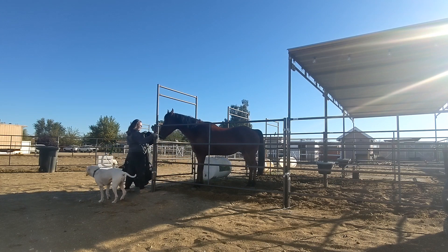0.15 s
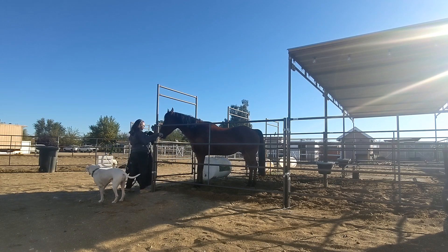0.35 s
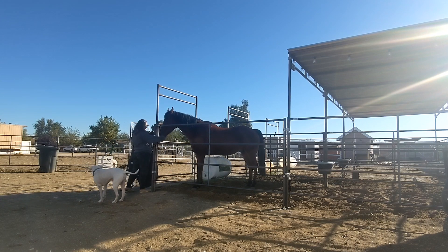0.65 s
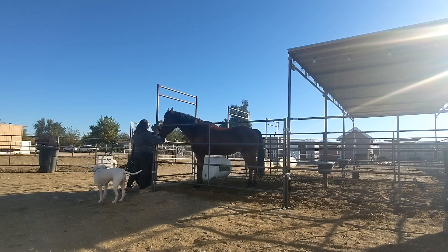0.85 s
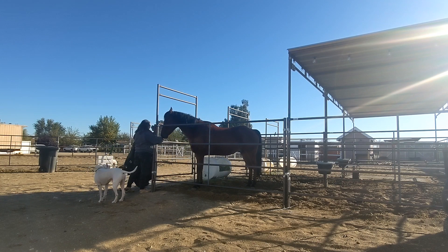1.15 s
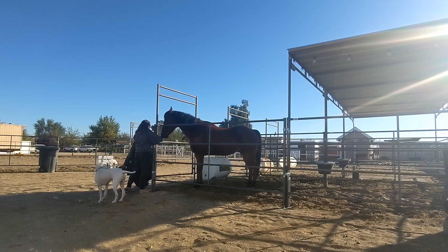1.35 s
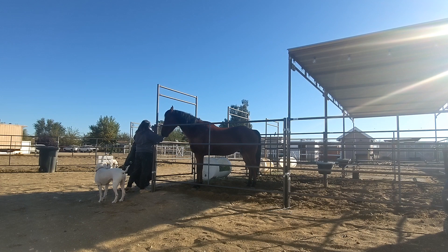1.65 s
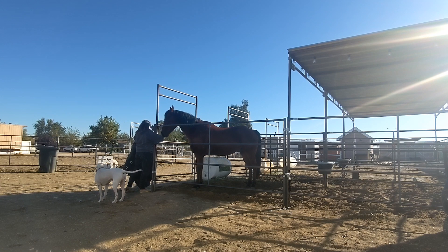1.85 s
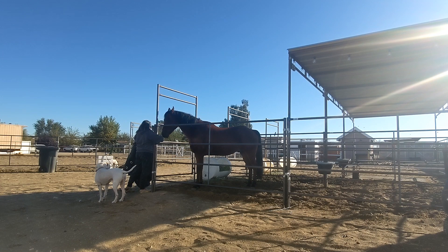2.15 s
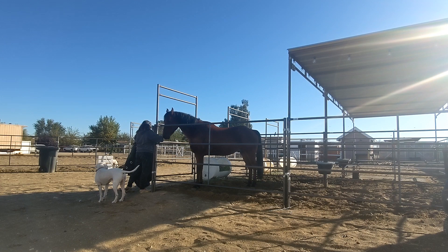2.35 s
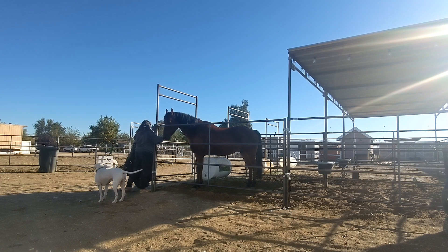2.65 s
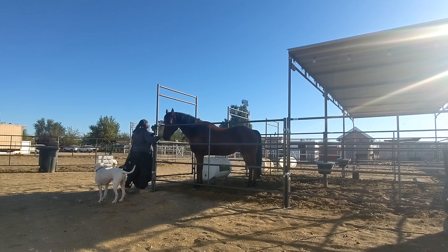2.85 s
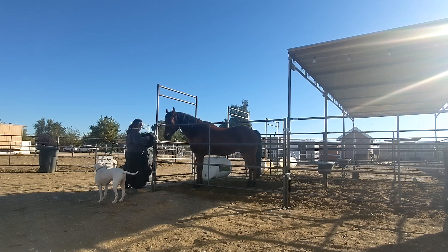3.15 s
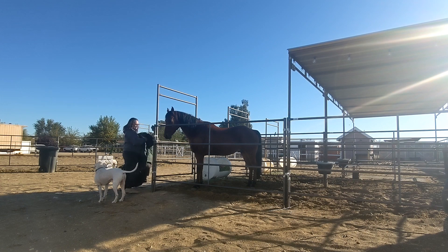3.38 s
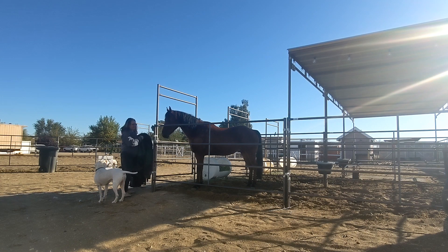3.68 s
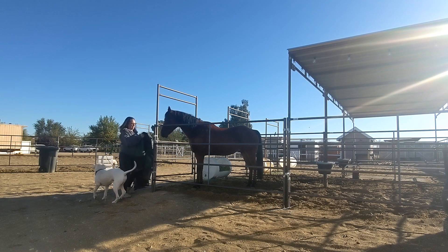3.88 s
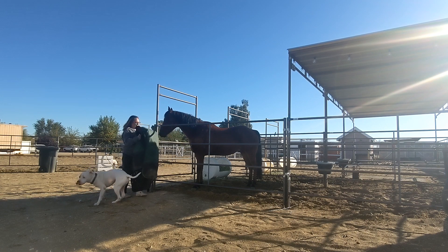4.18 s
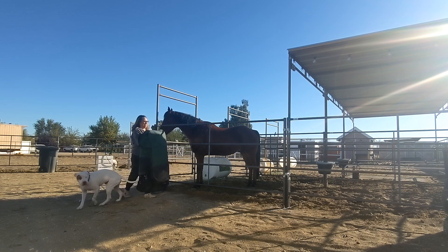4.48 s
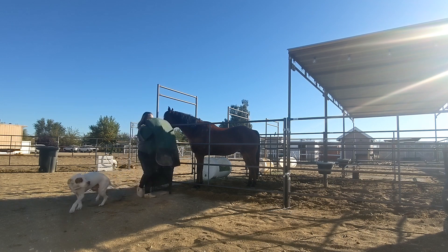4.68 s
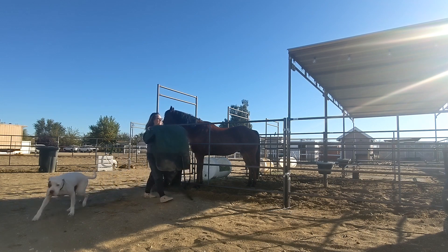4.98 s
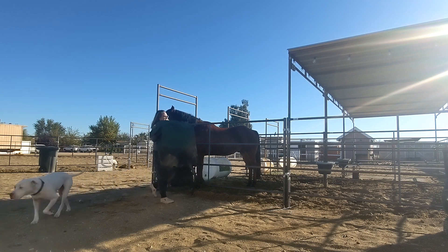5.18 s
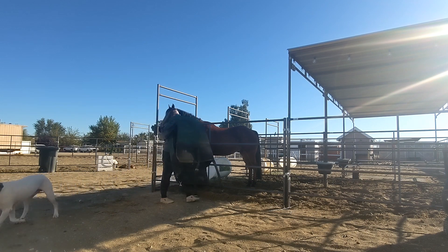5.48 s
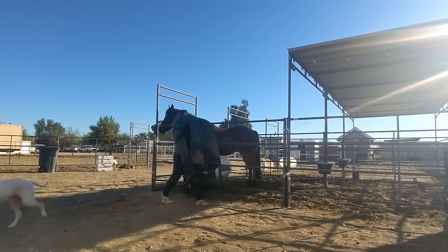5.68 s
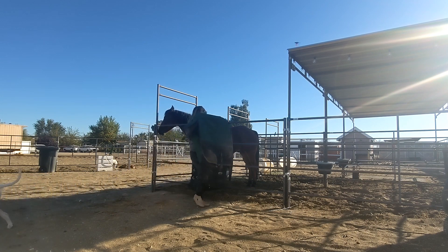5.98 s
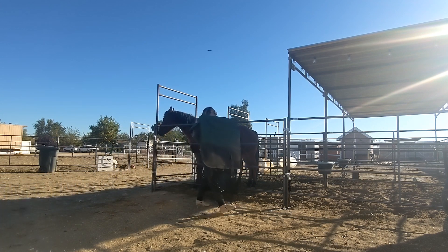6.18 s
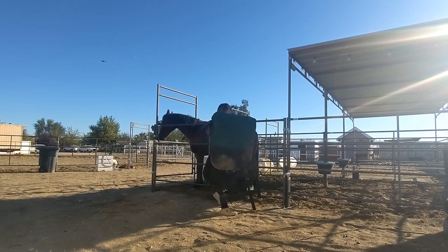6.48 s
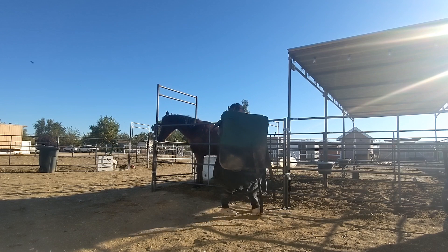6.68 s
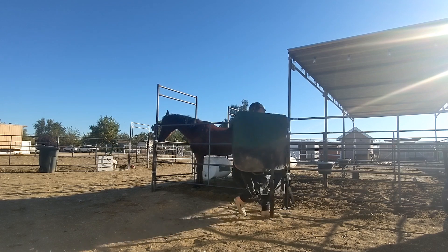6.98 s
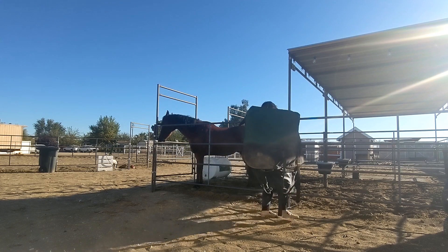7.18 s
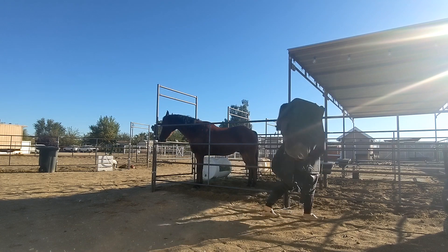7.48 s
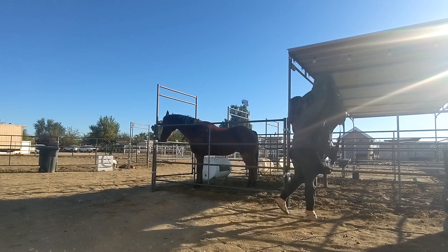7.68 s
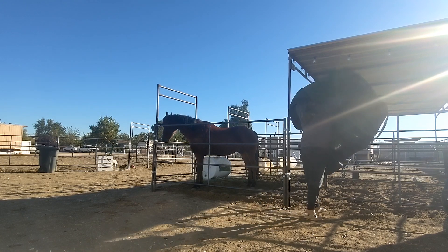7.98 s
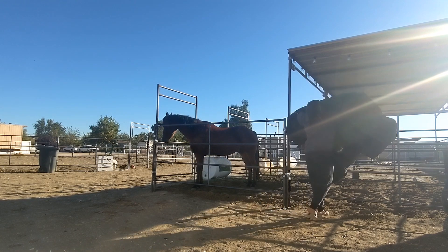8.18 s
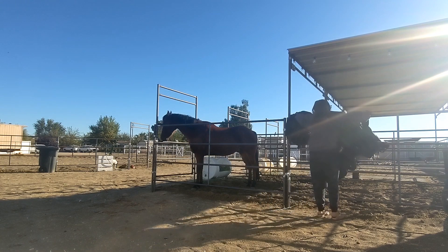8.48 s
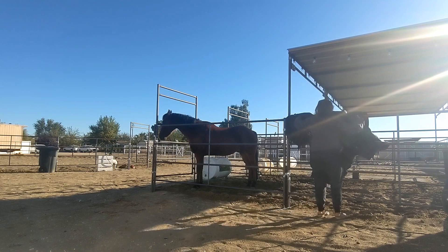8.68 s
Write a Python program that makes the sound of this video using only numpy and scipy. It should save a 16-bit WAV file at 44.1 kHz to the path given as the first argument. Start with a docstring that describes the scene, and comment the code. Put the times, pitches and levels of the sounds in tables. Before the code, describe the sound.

At an outdoor horse pen, a metal snap and chain clank hard on hollow steel pipes in the first second, then clink faintly as the snap is worked and pings free. A stiff blanket rustles with scuffs and soft footfalls, a buckle knocks once, a small bird chirps twice, and finally buckles strike the rail amid big cloth flaps. Stereo microphones in open air, with faint hiss and distant low rumble.

```python
"""A chain and snap clank on the steel pipes of an outdoor horse pen: noise through crowded resonances,
plus ringing modes. A stiff blanket rustles as it is carried (swelling noise bands), then its buckles
strike the top rail. Straps and grit tick, cloth and boots scuff, feet thud: short noise bursts.
A small bird chirps twice (gliding sines) over a low, distant rumble and a faint hiss (shaped noise)."""
import sys
import numpy as np
from scipy import signal
from scipy.fft import rfft, irfft, next_fast_len
from scipy.io import wavfile

SR = 44100
rng = np.random.default_rng(int(sys.argv[2]) if len(sys.argv) > 2 else 0)


def int16_out(signal):
    """Quantize to a 16-bit WAV file."""
    q = np.round(np.clip(np.atleast_2d(signal).T, -1, 1) * 32767)
    wavfile.write(sys.argv[1], SR, q.astype(np.int16))


N = 389844
TIME_S = np.arange(N) / SR
AGE_S = np.arange(SR) / SR  # one second from the start of a sound

# Event levels are relative: each source adds its own trim.
# blows on the steel pipes (two on the gate, then one buckle knock at 4.3 s), the snap knocking as it
# is worked, buckles hitting the rail:
# (time [s], level [dB], treble [dB re level], ring [dB], rattle length [s])
PIPE_BLOWS = [(0.585, -7, -9, -2, 0.0092), (0.99, -13, -11, -1, 0.018), (4.302, -14.5, -9, -15, 0.0059)]
SNAP_BLOWS = [(0.004, -28.5, -38, 0, 0.029), (0.128, -22, -18, -3.5, .014), (1.08, -9.5, -19, -5.5, 0.009),
              (1.335, -42.5, -40, 0, 0.042), (1.851, -24.5, -22, -1, 0.036),
              (1.997, -24, -19.5, -5.5, 0.017), (2.118, -40.5, -37, -3.5, 0.012),
              (2.27, -41.5, -27, -2.5, .03), (2.3, -35.5, -16, -8, 0.031), (2.361, -30, -10, -6.5, 0.0048),
              (2.509, -34.5, -14, -11, 0.022), (2.541, -33.5, -20, -4, 0.027),
              (2.606, -28, -11.5, -8, 0.013), (2.879, -25, -19, -7.5, 0.026)]
BUCKLE_BLOWS = [(7.779, -12.5, -6, 1, 0.02), (8.075, -11.5, -4, -3, 0.017), (8.206, -9.5, -13, -9.5, 0.013),
                (8.34, -26.5, -9, -10.5, 0.012), (8.72, -38.5, -14, -15, 0.044),
                (8.807, -14.5, 0, -1.5, 0.003)]
# clearest touches of chain links: (time [s], level [dB])
LINK_TOUCHES = [(0.0574, -42), (0.2802, -34), (0.319, -35), (0.374, -26.5), (0.3948, -28), (0.882, -35.5),
                (1.586, -41.5), (1.914, -42)]
# dry ticks of straps and grit: (time [s], level [dB])
TICKS = [(0.3704, -32.5), (0.9049, -30.5), (3.9374, -33), (4.6457, -32.5), (5.418, -43.5), (5.909, -46.5),
         (6.7763, -41.5)]
# scuffs of heavy cloth and boots: (time [s], level [dB])
SCUFFS = [(3.573, -38.5), (4.46, -35.5), (4.651, -38.5), (4.849, -39), (5.063, -29.5), (5.692, -53.5),
          (8.422, -37.5)]
# dull footfalls and bumps: (time [s], level [dB])
THUDS = [(0.68, -35.5), (2.651, -41.5), (2.911, -38.5), (4.47, -37.5), (4.635, -33.5), (5.077, -60),
         (6.26, -41), (8.238, -34)]
# blows that set off the gate's clear note: (time [s], level [dB])
SINGING = [(0.0, -49), (1.08, -58), (2.926, -38.5)]
# pulls and swings of the blanket: (time of height [s], length [s], flap [dB], rub [dB], swish [dB])
SWINGS = [(3.59, 0.13, -65, -63, -60.5), (3.787, 0.23, -60.5, -53.5, -51), (3.911, 0.059, -65, -57, -47.5),
          (4.347, 0.42, -55, -53, -54.5), (4.665, 0.097, -56.5, -51.5, -53),
          (4.89, 0.26, -60.5, -46, -50.5), (5.173, 0.31, -60, -52.5, -58), (6.804, 0.13, -65, -56.5, -59.5),
          (7.533, 0.35, -52.5, -51.5, -51), (7.855, 0.3, -46, -46.5, -46), (8.305, 0.56, -48.5, -55.5, -52),
          (8.826, 0.16, -55, -48, -64)]
# bird notes: (time of middle [s], length [s], pitch [Hz], glide [octaves], level [dB])
CHIRPS = [(5.48, .1, 4760, -.6, -58), (6.188, 0.049, 2570, 0, -55.5), (6.19, .04, 4020, -0.088, -57),
          (6.276, 0.069, 4760, 0.15, -47), (6.28, 0.056, 2660, 0.39, -44)]

# ringing modes of pipes, snap, rail and links, and the snap's ping as it comes free:
# (frequency [Hz], level [dB], t60 [s])
PIPE_MODES = [(950, -11, .6), (1005, -7.5, .73), (1416, -1, .7), (1440, -7.5, .57), (1884, -10, .6),
              (2110, -5, .33), (2320, -12, .5), (2670, -16, .6), (2790, -4.5, .37), (3220, -10, .62),
              (3790, -8, .25), (5450, -5.5, .35), (5660, -2, .5), (5540, -4, .6), (5740, -5, .6),
              (5840, -3.5, .46), (6126, -13, .45), (6890, -12, .29), (6690, -12, .4), (7600, -2, .44),
              (8500, -6, .35), (10150, -5, .35), (13800, -7, .35), (15280, -2.5, .22), (15685, 6, .22)]
SNAP_MODES = [(988, -7.5, 1.0), (1503, -2, 0.38), (1547, -3, 0.34), (2053, -4.5, 0.27), (2470, -3.5, .8),
              (2596, -2.5, .55), (2724, -1.5, .35), (2920, -8.5, 0.47), (3030, -7.5, 1), (3290, -4, .25),
              (3590, -9.5, 0.72), (4326, 2.5, 0.15), (5740, -8.5, .26), (6632, -7, .25), (7240, 0, 0.22),
              (8370, 5.5, .26), (8600, 4, 0.29)]
RAIL_MODES = [(671.6, -4, 0.85), (758, -7, 0.97), (1034, -5.5, 1), (1371, 1, 0.61), (1865, -4, 0.66),
              (2000, -11, 0.5), (2640, -3.5, 0.35), (3370, -11.5, 0.58), (5490, 2, 0.51), (5420, 5.5, 0.33),
              (5680, -2.5, 0.37), (6240, -11, 0.27), (6700, 7.5, 0.099), (8560, 3.5, 0.14),
              (8630, -9, 0.15), (15300, 5, 0.15), (15400, -8, .35)]
LINK_MODES = [(10110, -2, .17), (10310, -0.5, .35), (10300, -4.5, 0.13), (11230, -2, .16),
              (11170, -1, 0.16), (12020, -0.5, .16), (12100, -8, 0.13)]
RELEASE_MODES = [(8385, -34, 0.5), (8410, -28, 0.23)]
# resonances of the rubbing folds: (frequency [Hz], width [Hz], level [dB])
FOLDS = [(1567, 400, -3.5), (2350, 840, -2), (3390, 1300, -10.5)]

# colour of the dense clatter; a pipe's wall modes crowd above 5.4 and 15.2 kHz:
# (frequency [Hz], level [dB])
PIPE_CLATTER = [(300, -28), (700, -5.5), (980, 3), (1200, -3.5), (1900, 6), (2300, -1), (3000, -4.5),
                (4400, -5.5), (5150, -12), (5600, 2), (8500, -3.5), (11500, -12), (14300, -8.5),
                (15500, -0.5)]
SNAP_CLATTER = [(300, -36.5), (600, -11), (1000, -6.5), (1250, -8), (1520, 2), (1800, -10), (2500, -1),
                (3400, 7.5), (5000, -1.5), (6200, 5.5), (8600, -2.5), (9600, -2), (12000, -10),
                (15500, -13)]
RAIL_CLATTER = [(250, -33), (480, 1.5), (680, 10), (1150, -1), (1900, 7), (2800, -0.5), (5150, -5.5),
                (5480, 11.5), (7400, -2.5), (8600, -2.5), (10500, -9.5), (12900, -7), (14900, -2),
                (15300, 1.5)]
# colour of the short contacts: (frequency [Hz], level [dB])
TICK_COLOUR = [(400, 2.5), (1200, 0), (3000, 1.5), (7000, -3.5), (16000, -3)]
SCUFF_COLOUR = [(250, 6.5), (600, -7.5), (1200, 3), (2400, -6), (4000, -10.5), (12000, -24)]
THUD_COLOUR = [(40, -23), (85, -2), (140, 3.5), (200, -8), (300, -16), (800, -35), (4000, -65.5)]
# colour of the flapping folds and the swishing shell: (frequency [Hz], level [dB])
FLAP_COLOUR = [(200, -6), (300, -8.5), (520, -2), (850, -0.5), (1150, -2.5), (1700, -22.5)]
SWISH_COLOUR = [(1760, -26.5), (3000, 3.5), (3910, -2.5), (4290, -1.5), (7400, 1.5), (10800, -8),
                (15000, 0), (16000, -11)]
# colour of the surroundings: (frequency [Hz], level [dB])
RUMBLE_COLOUR = [(12, -58), (20, -30.5), (27, -36.5), (30, -65), (40, -12.5), (108, -0.5), (125, -1),
                 (145, -4), (203, -13), (258, -16), (403, -29), (500, -28.5), (650, -64.5), (1100, -120)]
AIR_COLOUR = [(240, -29.5), (400, -5), (814, -1), (1400, -8.5), (1630, -11), (2120, -7.5), (3210, -16.5),
              (6540, -19), (10900, -30), (15000, -22), (16000, -17)]
# likeness of left and right noise: (frequency [Hz], correlation [-1..1])
LIKENESS = [(30, 0.88), (130, 1), (260, 0.71), (600, 0.24), (1500, 0.19), (4000, 0), (16000, 0.13)]
# difference between the two microphones: (frequency [Hz], left minus right [dB])
MIC_BALANCE = [(100, -0.5), (1100, 3), (2800, 0), (5500, -0.5), (8500, 4.5), (11000, -1.5), (14000, 7)]
# centres of the bass, middle and treble zones of the modes: (frequency [Hz])
ZONES_HZ = [1400, 5500, 14500]
# soft rustle while the blanket is carried: (flap [dB], rub [dB], swish [dB])
CARRY_DB = [-66.5, -65.5, -69]

RUMBLE_DB, AIR_DB = -49, -61
CARRY_S, CARRY_FADE_S = 3.34, 0.07
SWELL_SHARE = 0.51  # share of a swing's length spent swelling
ARCH_OCTAVES = 0.17  # sag of a bird note's pitch at both ends
RELEASE_S = 2.88  # the snap comes free
JINGLE_DB, JINGLE_SPREAD_DB = -53.5, 4
SINGING_HZ = 3029
NOTE_ATTACK_S, NOTE_HOLD_S, NOTE_T60_S = 0.027, 0.1, 1.12
BEAT_DEPTH, BEATS_PER_S, FIRST_SWELL_S = 0.44, 6.0, 0.055
# harder blows have thinner bass: dB lost per dB above the reference blow
BASS_LOSS, REFERENCE_BLOW_DB = 0.37, -20.5
CUTOFF_HZ = 15850


def from_db(db):
    """Decibels to gain."""
    return 10 ** (np.asarray(db) / 20)


def rms_one(x):
    """Scale to an rms of 1."""
    return x / np.sqrt(np.mean(x ** 2) + 1e-20)


def at_hz(points, hz):
    """Read a curve on a log-frequency axis."""
    known_hz, values = np.transpose(points)
    return np.interp(np.log(hz + 1), np.log(known_hz), values)


def add(out, time_s, sound):
    """Mix a sound in at a time."""
    start = max(0, round(time_s * SR))
    out[:, start:start + sound.shape[-1]] += sound[..., :N - start]


def panned(left_right_db):
    """Left and right gains for a level difference."""
    return from_db(np.array([[left_right_db], [-left_right_db]]) / 2)


def drift(knots_per_s, size):
    """Straight lines between random knots of spread 1."""
    knots = rng.standard_normal(size // 20 + 2)
    return np.interp(np.arange(size) * knots_per_s / SR, np.arange(len(knots)), knots)


def noise(colour, size, band_hz=(0, SR), comb=1):
    """Stereo noise of a given colour and rms 1, its sides alike mainly in the bass."""
    length = next_fast_len(size, True)
    hz = np.fft.rfftfreq(length, 1 / SR)
    mid, side = rfft(rng.standard_normal((2, length)))
    alike = np.clip(at_hz(LIKENESS, hz), -1, 1)
    pair = np.sqrt(1 + alike) * mid + np.sqrt(1 - alike) * side * [[1], [-1]]
    in_band = (hz >= band_hz[0]) * (hz < band_hz[1])
    spectrum = pair * comb * from_db(at_hz(colour, hz)) * in_band
    return rms_one(irfft(spectrum, length)[:, :size])


def afresh(loop):
    """A loop of noise entered at a random point."""
    return np.roll(loop, rng.integers(SR), axis=-1)


def envelope(attack_s, hold_s, t60_s):
    """Rise, hold and exponential decay."""
    rise = 1 - np.exp(-AGE_S / abs(attack_s))
    return rise * np.exp(-np.log(1000) * np.maximum(AGE_S - hold_s, 0) / abs(t60_s))


def ringing(modes, attack_s, split_hz, twin):
    """Each mode as a decaying complex tone, with a weaker twin that beats against it."""
    tones = []
    for hz, db, t60_s in modes:
        pair_hz = hz + np.array([[0], [split_hz * rng.uniform(0.5, 2.3)]])
        pair = np.array([[1], [twin]]) * np.exp(2j * np.pi * pair_hz * AGE_S)
        tones.append(from_db(db) * pair * envelope(attack_s, 0, t60_s))
    return np.array(tones)


def ring(tones, strength_db=0, scatter_db=1.1):
    """One strike: every mode reaches each side with its own strength and phase."""
    gains = from_db(strength_db + scatter_db * rng.standard_normal((2, len(tones))))
    weights = gains[..., None] * np.exp(2j * np.pi * rng.random((2, len(tones), 2)))
    return np.tensordot(weights, tones, 2).real


def surroundings(throb_db=0.97):
    """Distant, slightly throbbing rumble and a faint even hiss."""
    rumble = from_db(RUMBLE_DB + throb_db * drift(15, size=N)) * noise(RUMBLE_COLOUR, size=N)
    return rumble * panned(1.3) + from_db(AIR_DB) * noise(AIR_COLOUR, size=N)


def bird(level_db=-4.5, waver=0.062, flutter_db=3.3, echo_db=-11):
    """Short gliding whistles, rough from pitch waver, thrown back by the shelter's roof."""
    out = np.zeros((1, N))
    for time_s, length_s, middle_hz, glide, db in CHIRPS:
        along = np.minimum(2 * AGE_S / length_s - 1, 1)  # -1 to 1 across the note
        hz = middle_hz * 2 ** (glide * along / 2 - ARCH_OCTAVES * along ** 2)
        cycles = np.cumsum(hz * (1 + waver * drift(1100, size=SR))) / SR
        gain = (1 - along ** 2) ** 2 * from_db(db + level_db + flutter_db * drift(280, size=SR))
        add(out, time_s - length_s / 2, gain * np.sin(2 * np.pi * cycles))
    # one echo a side
    echoes = np.array([np.roll(out[0], round(delay_s * SR)) for delay_s in (0.013, 0.027)])
    return out + from_db(echo_db) * echoes


def bursts(events, colour, level_db, attack_s, t60_s):
    """Short contacts with no ring: enveloped noise."""
    out, loop = np.zeros((2, N)), noise(colour, size=SR)
    for time_s, db in events:
        add(out, time_s, from_db(db + level_db) * envelope(attack_s, 0, t60_s) * afresh(loop))
    return out


def footfalls():
    """Dull low thuds of feet and bumps."""
    return bursts(THUDS, THUD_COLOUR, level_db=-1.5, attack_s=0.0115, t60_s=0.34)


def scuffs():
    """Heavy cloth and boots scrape briefly."""
    return bursts(SCUFFS, SCUFF_COLOUR, level_db=-11.0, attack_s=0.00086, t60_s=0.246)


def ticks():
    """Straps and grit tick drily, with a near-instant attack."""
    return bursts(TICKS, TICK_COLOUR, level_db=-13, attack_s=0.00047, t60_s=0.15)


def handling():
    """Flap, rub and swish gains: a swell for each swing over the soft rustle of carrying."""
    power = from_db(CARRY_DB)[:, None] ** 2 * np.clip((TIME_S - CARRY_S) / CARRY_FADE_S, 0, 1)
    for time_s, length_s, flap_db, rub_db, swish_db in SWINGS:
        width_s = length_s * np.where(TIME_S < time_s, SWELL_SHARE, 1 - SWELL_SHARE)
        swell = np.exp(-np.minimum(((TIME_S - time_s) / width_s) ** 2, 20))
        power = power + (from_db([flap_db, rub_db, swish_db])[:, None] * swell) ** 2
    return np.sqrt(power)


def blanket(flap_db=-1.0, rub_db=-2.5, swish_db=-3.0, crinkle_db=2.0, shifting_db=3.0):
    """Heavy folds flap and rub while the stiff shell swishes above; all crinkle together."""
    flap_gain, rub_gain, swish_gain = handling()
    cloth = flap_gain * from_db(flap_db) * noise(FLAP_COLOUR, size=N)
    cloth += swish_gain * from_db(swish_db) * noise(SWISH_COLOUR, size=N) * panned(2.3)
    friction = rng.standard_normal((2, N))
    for hz, width_hz, db in FOLDS:
        edges_hz = [hz - width_hz / 2, hz + width_hz / 2]
        fold = signal.sosfilt(signal.butter(2, edges_hz, "band", fs=SR, output="sos"), friction)
        shifting = from_db(rub_db + db + shifting_db * drift(12, size=N))
        cloth += rub_gain * shifting * rms_one(fold)
    return cloth * from_db(crinkle_db * drift(120, size=N) + 1.0 * drift(22, size=N))


def chain(level_db=-13, shiver_db=5.5, touch_db=-6, touch_t60_s=0.039, count=40):
    """Small links touch with a faint tick and tinkle on a few very high modes."""
    out = np.zeros((2, N))
    tones = ringing(LINK_MODES, attack_s=0.0038, split_hz=51, twin=0.91)
    touch = noise(SWISH_COLOUR, size=SR)
    # fainter links jingle at random until the snap is free
    jingle = [(RELEASE_S * (k + rng.random()) / count,
               JINGLE_DB + JINGLE_SPREAD_DB * rng.standard_normal()) for k in range(count)]
    for time_s, db in LINK_TOUCHES + jingle:
        tick = from_db(touch_db) * envelope(0.0016, 0, touch_t60_s) * afresh(touch)
        gain = from_db(db + level_db + shiver_db * drift(160, size=SR))
        add(out, time_s, gain * (ring(tones) + tick))
    return out


def release(pan_db=-5.0):
    """A clear, slowly beating gate note follows knocks, loudest when the snap pings free."""
    out = np.zeros((2, N))
    beating = 1 + BEAT_DEPTH * np.cos(2 * np.pi * BEATS_PER_S * (AGE_S - FIRST_SWELL_S))
    tone = np.sin(2 * np.pi * SINGING_HZ * AGE_S + [[0], [0.8]])  # right side leads by 0.8 rad
    note = envelope(NOTE_ATTACK_S, NOTE_HOLD_S, NOTE_T60_S) * beating * tone
    for time_s, db in SINGING:
        add(out, time_s, from_db(db) * note * panned(pan_db))
    add(out, RELEASE_S, ring(ringing(RELEASE_MODES, attack_s=0.00074, split_hz=6.8, twin=0.23)))
    return out


def crowded_modes():
    """The many weak resonances of one welded panel, as a gain at each frequency."""
    hz = np.fft.rfftfreq(next_fast_len(SR, True), 1 / SR)
    centres_hz = np.cumsum(rng.uniform(25, 100, 290))
    return np.sqrt(np.sum(1 / (1 + ((hz - centres_hz[:, None]) / 9) ** 2), axis=0))


def steel(blows, colour, modes, clatter_db, bass_db, middle_db, modes_db, attack_s, build_up_s,
          t60_s, rough_db, tail_db, tail_t60_s, pan_db, lead_s):
    """Metal chatters on pipe: dense clatter, dying sooner in the treble, and ringing modes."""
    out, panel = np.zeros((2, N)), crowded_modes()
    bands_hz = [(0, 2500), (2500, 12000), (12000, SR)]
    decay_factors = [1.1, 1.0, 0.75]
    clatters = [noise(colour, size=SR, band_hz=band, comb=panel) for band in bands_hz]
    # squaring the comb favours the sharpest resonances
    tails = [noise(colour, size=SR, band_hz=band, comb=panel ** 2) for band in bands_hz]
    tones = ringing(modes, build_up_s, split_hz=18, twin=0.82)
    log_hz = np.log(np.array(modes)[:, 0])
    for time_s, level_db, treble_db, ring_db, rattle_s in blows:
        blow_bass_db = bass_db - BASS_LOSS * (level_db - REFERENCE_BLOW_DB)
        levels_db = [blow_bass_db, middle_db, treble_db]
        chatter = from_db(rough_db * np.tanh(drift(350, size=SR)))
        zone_db = np.interp(log_hz, np.log(ZONES_HZ), levels_db)
        sound = ring(tones, modes_db + ring_db + zone_db)
        for clatter, tail, db, factor in zip(clatters, tails, levels_db, decay_factors):
            contact = chatter * envelope(attack_s, rattle_s, t60_s * factor) * afresh(clatter)
            after = from_db(tail_db) * envelope(0.041, 0, tail_t60_s * factor) * afresh(tail)
            sound = sound + from_db(clatter_db + db) * (contact + after)
        add(out, time_s - lead_s, from_db(level_db) * sound * panned(pan_db))
    return out


def buckles():
    """Buckles strike the top rail, whose modes build up slowly after a sharp contact."""
    return steel(BUCKLE_BLOWS, RAIL_CLATTER, RAIL_MODES, clatter_db=-3.0, bass_db=-17.0,
                 middle_db=-10.5, modes_db=-3.5, attack_s=0.0016, build_up_s=0.01, t60_s=0.24,
                 rough_db=2.0, tail_db=-17.5, tail_t60_s=1.0, pan_db=-0.6, lead_s=0.003)


def pipes():
    """Blows set the steel pipes clattering and ringing."""
    return steel(PIPE_BLOWS, PIPE_CLATTER, PIPE_MODES, clatter_db=0.0, bass_db=-14.5,
                 middle_db=-10.0, modes_db=-3.5, attack_s=0.0048, build_up_s=0.0048, t60_s=0.22,
                 rough_db=2.0, tail_db=-17.5, tail_t60_s=0.64, pan_db=0.5, lead_s=0.002)


def snap():
    """The snap knocks on the steel with a quick attack and rings as it is worked."""
    return steel(SNAP_BLOWS, SNAP_CLATTER, SNAP_MODES, clatter_db=-3.5, bass_db=-14.5,
                 middle_db=-10.0, modes_db=-4.5, attack_s=0.0021, build_up_s=0.002, t60_s=0.23,
                 rough_db=2.0, tail_db=-15, tail_t60_s=0.74, pan_db=2.0, lead_s=0.002)


def scene():
    """Open air, feet, cloth and steel."""
    background = surroundings() + bird()
    contacts = footfalls() + scuffs() + ticks()
    metal = chain() + release() + buckles() + pipes() + snap()
    return background + contacts + blanket() + metal


def record(dry):
    """Two microphones of differing frequency balance; the top is cut steeply."""
    balance_db = at_hz(MIC_BALANCE, np.fft.rfftfreq(N, 1 / SR))
    heard = irfft(rfft(dry) * from_db(np.array([balance_db, -balance_db]) / 2), N)
    # order 10, 0.2 dB ripple, 70 dB rejection
    return signal.sosfilt(signal.ellip(10, 0.2, 70, CUTOFF_HZ, fs=SR, output="sos"), heard)


dry = scene()
out = record(dry)
int16_out(out)
```